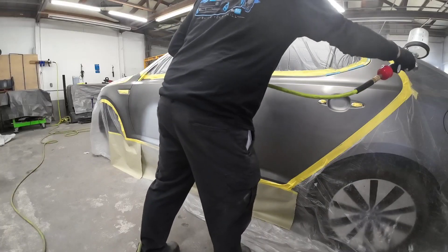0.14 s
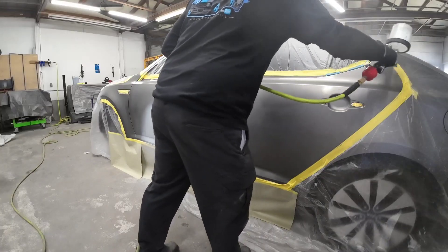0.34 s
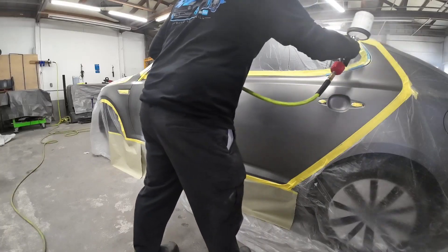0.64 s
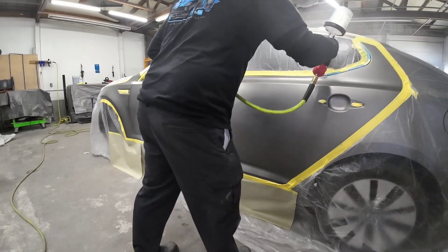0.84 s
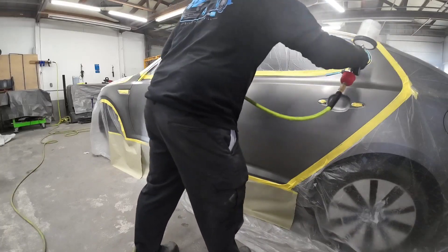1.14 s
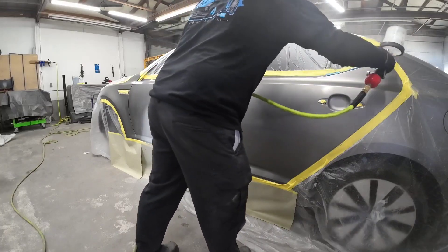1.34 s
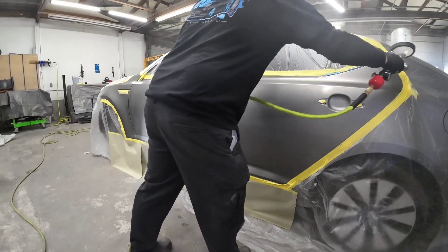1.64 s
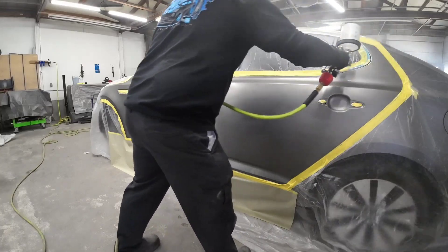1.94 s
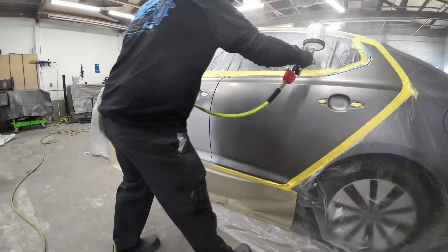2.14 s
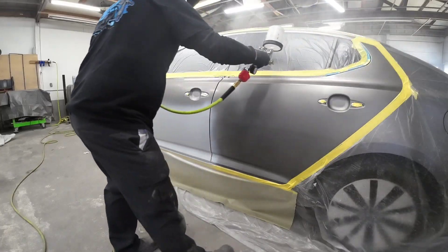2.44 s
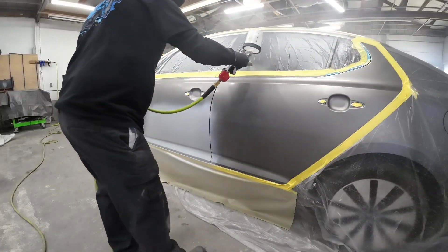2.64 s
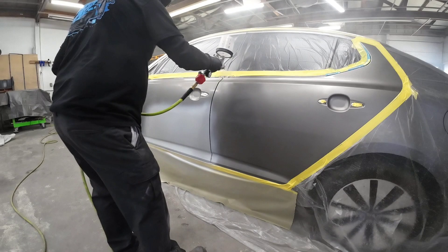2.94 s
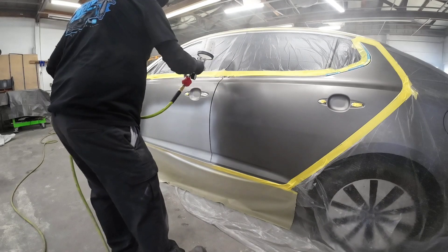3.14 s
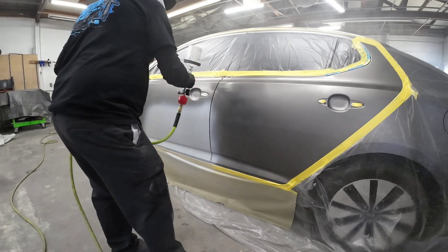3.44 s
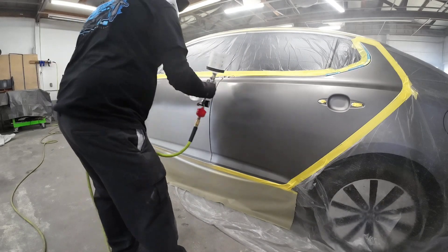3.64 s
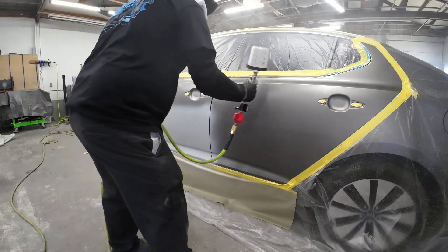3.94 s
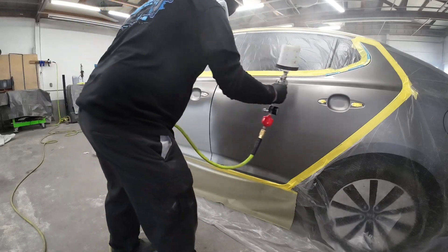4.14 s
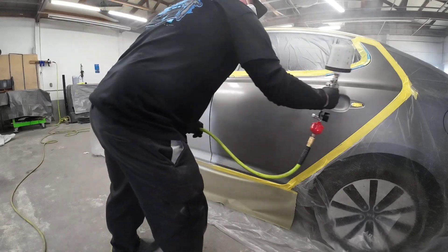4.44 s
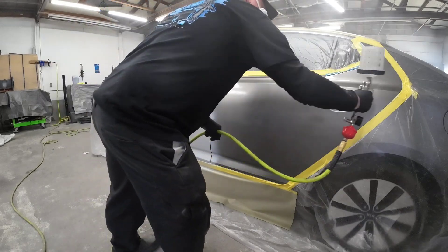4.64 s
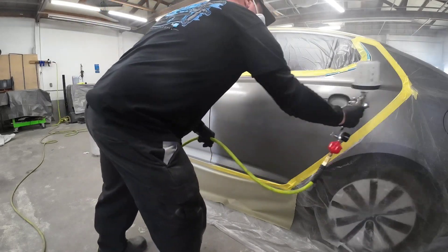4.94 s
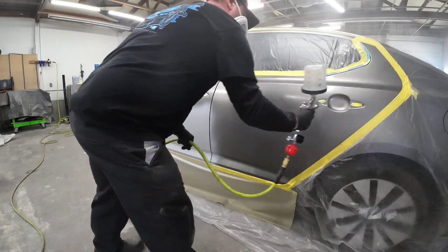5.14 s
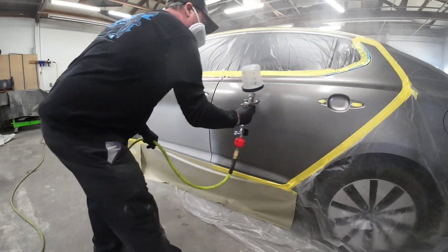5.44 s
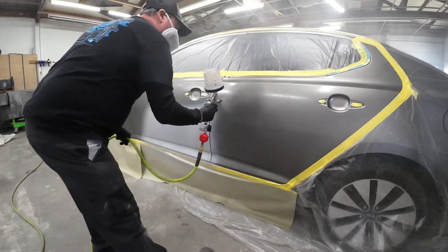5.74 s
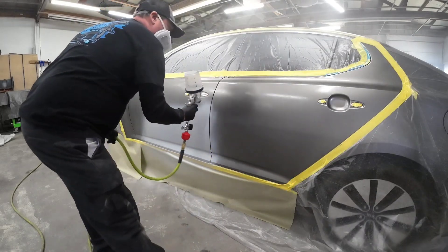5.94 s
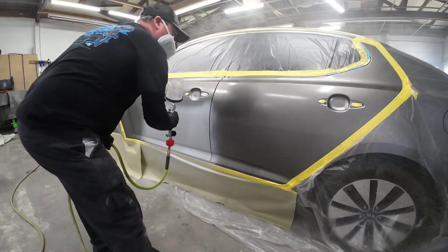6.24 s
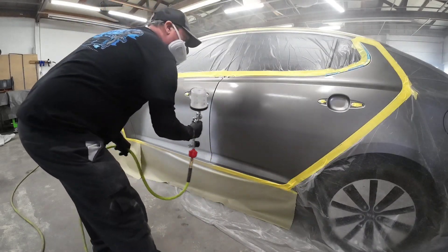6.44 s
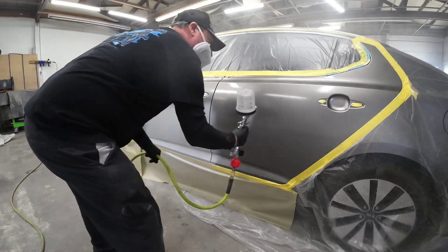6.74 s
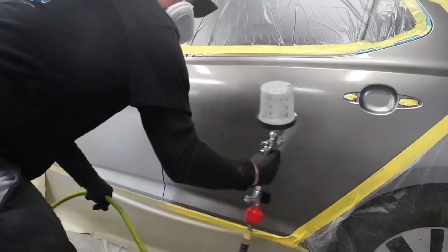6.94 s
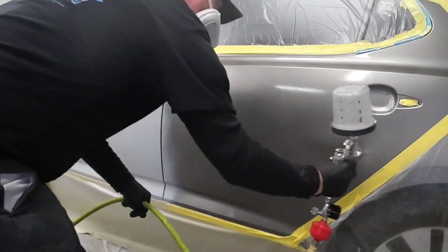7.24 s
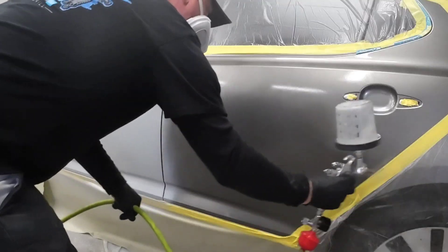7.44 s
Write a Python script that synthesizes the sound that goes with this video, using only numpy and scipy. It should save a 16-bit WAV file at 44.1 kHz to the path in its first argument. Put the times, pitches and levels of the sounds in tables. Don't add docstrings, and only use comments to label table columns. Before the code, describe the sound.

A paint spray gun hisses without a break along a car door in a workshop. The airy jet swells, dulls and brightens with every pass, its softer roar on the metal dropping briefly at the turns. Loose masking film rumbles faintly in the draught. In the second half a low motor hum fades in and slowly sinks. One close microphone, centred, fairly dry.

```python
import sys
import numpy as np
from scipy import signal
from scipy.fft import rfft, irfft
from scipy.io import wavfile

SR = 44100
rng = np.random.default_rng(int(sys.argv[2]) if len(sys.argv) > 2 else 0)


def invert_db(level):
    return 10 ** (np.asarray(level, dtype=float) / 20)


def digitize_waveform(pressure):
    field = np.atleast_2d(pressure).T
    bounded = np.clip(field, -1, 1)
    quanta = np.round(bounded * 32767).astype(np.int16)
    wavfile.write(sys.argv[1], SR, quanta)


N = 334719
STEP = 64


def rms_one(x):
    return x / np.sqrt(np.mean(x ** 2) + 1e-20)


def in_time(rows, step=1):
    time_s, *columns = np.transpose(rows)
    now_s = np.arange(0, N, step) / SR
    return [np.interp(now_s, time_s, column) for column in columns]


def drift(rate_hz):
    r = np.exp(-2 * np.pi * rate_hz * STEP / SR)
    count = len(range(0, N, STEP))
    white = rng.standard_normal(N // STEP + 1001)
    return rms_one(signal.lfilter([1], [1, -2 * r, r * r], white)[-count:])


def swells(rows, rise_s, fall_s, centred=True):
    now_s, rows = np.arange(0, N, STEP) / SR, np.array(rows)
    hold_s = rows[:, 1:2]
    start_s = rows[:, :1] - centred * hold_s / 2
    rise = 1 + (now_s - start_s) / rise_s
    fall = 1 + (start_s + hold_s - now_s) / fall_s
    shape = np.clip(np.minimum(rise, fall), 0, 1)
    return rows[:, 2:].T @ np.sin(shape * np.pi / 2) ** 2


def hump(hz, centre_hz, below, above, db):
    octaves = np.log2(hz / centre_hz)
    power = invert_db(-np.where(octaves < 0, below, above) * octaves ** 2) ** 2
    return power / power.sum(axis=0) * invert_db(db) ** 2


# time_s, loudness_db, strike_db (how squarely it hits the panel), view_db (air cap in view)
JET = [(0, -26.5, -1.5, -12), (.5, -27.5, -2.5, -1), (.72, -27, 2.5, 10), (.86, -22, 2.5, -6),
       (1.3, -24, 1.5, 7), (1.8, -25, -8.5, 7.5), (1.9, -26.5, -1, 5.5), (2.35, -29.5, 0.5, -1.5),
       (2.85, -28, 0, 2), (3.3, -25, 1.5, -2), (3.8, -21.5, 1.5, -6), (4.35, -22, -0.5, -1),
       (4.82, -29.5, -1.5, 6), (5.2, -25.5, -1, 0), (5.92, -22, 1.5, -5), (6.1, -25, 4, -12),
       (6.8, -20.5, 2.5, -6), (7.59, -26.5, -3.5, -4)]
# middle_s, hold_s, splash_change_db
SWEEP_TURNS = [
    (.25, 0.22, -7),
    (.98, 0.11, -2.5),
    (1.73, 0.071, -4),
    (3.46, 0.21, -6),
    (4.92, 0.15, -3.5),
    (6.28, 0.065, -2),
    (7.52, 0.16, -2),
]
# start_s, hold_s, hiss_gain_db, extra_sizzle_db
NOZZLE_FACING = [
    (.2, 0.15, 4.5, 8),
    (.9, 0.11, 8, 8),
    (1.09, 0.073, 7.5, -8),
    (2.93, 0.16, 3.5, 1),
    (3.37, .18, 5.5, 8),
    (6.25, 0.063, 2.5, 2),
    (6.41, .02, -1.5, 2),
]
# middle_s, hold_s, sizzle_change_db
NOZZLE_SHADOWS = [(.14, .02, -25), (.48, .03, -35), (.67, .09, -13), (1.56, .02, -7), (2.1, .02, 3),
                  (2.42, .2, 1), (3.23, .09, -8), (3.65, .02, 8), (4.94, 0.19, -8), (5.98, 0.12, -3),
                  (6.42, .03, 12), (6.59, .03, 0), (7.5, 0.24, -44)]


def jet_levels():
    loud_db, strike_db, view_db = in_time(JET, step=STEP)
    turn_db, = swells(SWEEP_TURNS, rise_s=.047, fall_s=.047)
    face_db, bright_db = swells(NOZZLE_FACING, rise_s=.057, fall_s=.092, centred=False)
    shadow_db, = swells(NOZZLE_SHADOWS, rise_s=.06, fall_s=.06)
    swing_db = loud_db + face_db - loud_db.mean()
    hiss_db = loud_db + face_db
    splash_db = -37 + strike_db + turn_db
    lower_db = -31 + .36 * strike_db + .51 * turn_db + .35 * swing_db
    waver_db = .4 * drift(14)
    sizzle_db = -33.5 + .79 * swing_db + view_db + bright_db + shadow_db + waver_db
    return hiss_db, splash_db, lower_db, sizzle_db, face_db


# time_s, lag_ms
PANEL_LAG = [(0.0, 0.31), (0.42, 0.37), (0.78, 0.48), (1.0, 0.7), (1.41, 0.32), (1.97, 0.35), (2.61, 0.53),
             (3.02, 0.52), (3.5, 0.94), (3.69, 0.69), (4.74, 0.34), (5.13, 0.4), (5.64, 0.65), (6.14, 0.73),
             (6.44, 0.87), (6.65, 0.62), (7.26, 0.38), (7.59, 0.46)]
HISS_SINKS_OCT_PER_MS = .05


def jet_power(hz):
    hiss_db, splash_db, lower_db, sizzle_db, face_db = jet_levels()
    lag_ms, = in_time(PANEL_LAG, step=STEP)
    sink = 2 ** (-HISS_SINKS_OCT_PER_MS * (lag_ms - .5))
    power = hump(hz / sink, 9230, 7.2 + face_db, 26 + face_db, hiss_db)
    power = power + hump(hz, 1470, 8.7, 9, splash_db)
    power = power + hump(hz, 3590, 10.4, 8.6, lower_db)
    power = power + hump(hz, 13900, 18, 60, sizzle_db)
    return power + hump(hz, 437, 56, 5.8, -54 + .23 * (splash_db + 40.5))


# middle_s, hold_s, rise_over_calm_db
PUFFS = [(0, .05, 14), (.95, 1, 15), (2.05, .2, 15.5), (2.5, .2, 9), (3.17, 0.2, 20.5), (3.75, 0.088, 20),
         (4.3, 0.25, 11), (4.65, 0.19, 17), (5.4, 1, 4), (6.03, .05, 18), (6.6, .03, 17.5), (7.1, .2, 5),
         (7.45, 0.11, 21)]


def masking_film_power(hz):
    puff_db, = swells(PUFFS, rise_s=.17, fall_s=.17)
    return hump(hz, 300, 3.6, 1.8, -71 + puff_db)


# pitch_hz, band_level_db
SHOP_FLOOR = [(30, -85), (60, -77), (110, -74), (600, -65.5)]


def shop_floor_power(hz):
    pitch_hz, level_db = np.transpose(SHOP_FLOOR)
    return invert_db(np.interp(np.log(hz), np.log(pitch_hz), level_db)) ** 2


def turbulence(shared_db, local_db, own_db):
    edges_hz = 28 * 2 ** np.arange(0, 9.3, .25)
    hz = np.sqrt(edges_hz[1:] * edges_hz[:-1])[:, None]
    power = jet_power(hz) + masking_film_power(hz) + shop_floor_power(hz)
    white, out = rng.standard_normal((2, N)), np.zeros(N)
    gust = drift(21)
    eddies = [drift(1.4) for _ in range(len(hz) // 3 + 1)]
    for k, band_hz in enumerate(zip(edges_hz, edges_hz[1:])):
        bright = np.clip(np.log2(hz[k, 0] / 2000) / 2, 0, 1)
        flicker_db = bright * (shared_db * gust + local_db * eddies[k // 3] + own_db * drift(12.6))
        level = np.sqrt(power[k]) * invert_db(flicker_db)
        gain = np.interp(np.arange(N) / STEP, np.arange(power.shape[1]), level)
        sos = signal.butter(2, band_hz, "band", fs=SR, output="sos")
        out += gain * rms_one(signal.sosfilt(sos, white[k % 2]))
    return out


# time_s, lag_ms, share (negative = inverted)
WRIST_ECHO = [(0, 0.04, 0.042), (.7, 0.058, 0.025), (1.0, 0.12, 0.13), (1.5, 0.043, 0.072),
              (2.5, .12, 0.021), (3.03, 0.097, 0.31), (3.45, 0.14, 0.23), (3.95, 0.11, 0.31),
              (4.5, 0.093, 0.12), (4.9, 0.1, .01), (5.6, 0.085, 0.28), (5.92, 0.12, 0.21),
              (6.08, 0.12, 0.22), (6.22, 0.21, 0.39), (6.47, 0.18, 0.28), (6.7, .14, 0.45),
              (7.0, .12, 0.37), (7.59, 0.15, 0.17)]
FINE = 4


def bodywork(x, boost=1.15):
    hiss_sos = signal.butter(1, [2500, 14000], "band", fs=SR, output="sos")
    gun_sos = signal.butter(2, 9200, fs=SR, output="sos")
    bands = [signal.sosfiltfilt(hiss_sos, x), signal.sosfiltfilt(gun_sos, x)]
    narrow, dull = signal.resample_poly(bands, FINE, 1, axis=1)
    panel_ms, = in_time(PANEL_LAG)
    uneven = 1 + .35 * np.repeat(drift(3), STEP)[:N]
    near = (.45 / panel_ms) ** .5 * uneven
    gun_ms, gun_share = in_time(WRIST_ECHO)
    paths = [(panel_ms, near * .11, narrow),
             (panel_ms + .062, near * -.085, narrow),
             (panel_ms - .056, near * -.035, narrow),
             (gun_ms, gun_share, dull)]
    out = x.copy()
    for lag_ms, share, source in paths:
        position = FINE * (np.arange(N) - lag_ms * SR / 1000)
        out += boost * share * np.interp(position, np.arange(FINE * N), source)
    return out


SPLIT_PER_S, SPLIT_LOW_HZ, SPLIT_HIGH_HZ = 7.3, 4200, 13800
SPLIT_MIN_WIDTH_HZ, SPLIT_MAX_WIDTH_HZ = 1000, 2300


def split_bands(mid, size=2048):
    side, hz = np.zeros(N), np.arange(size // 2 + 1) * SR / size
    window = signal.windows.kaiser_bessel_derived(size, 4 * np.pi)
    for when, where, wide in rng.random((int(SPLIT_PER_S * N / SR), 3)):
        start = 711 + size // 2 * int(when * (2 * N // size - 3))
        low_hz = SPLIT_LOW_HZ + (SPLIT_HIGH_HZ - SPLIT_LOW_HZ) * where ** 1.2
        width_hz = SPLIT_MIN_WIDTH_HZ + wide ** 2 * (SPLIT_MAX_WIDTH_HZ - SPLIT_MIN_WIDTH_HZ)
        frame = slice(start, start + size)
        band = (hz > low_hz) * (hz < low_hz + width_hz)
        level = np.std(irfft(rfft(mid[frame] * window) * band)) * invert_db(.2)
        noise = rms_one(irfft(rfft(rng.standard_normal(size)) * band))
        side[frame] += level * window * noise
    return side


# time_s, level_db
MOTOR_HUM = [
    (4.4, -101),
    (4.65, -66),
    (5.31, -56),
    (5.95, -52),
    (6.3, -65),
    (7.05, -50),
    (7.36, -52),
    (7.41, -62),
    (7.54, -52),
]
HUM_START_HZ, HUM_SAG_HZ_PER_S = 89.5, 3.4


def motor():
    level_db, = in_time(MOTOR_HUM)
    since_s = np.arange(N) / SR - MOTOR_HUM[0][0]
    hz = HUM_START_HZ - HUM_SAG_HZ_PER_S * np.maximum(since_s, 0)
    fade_in = np.clip(since_s / .15, 0, 1)
    return np.sqrt(2) * fade_in * invert_db(level_db) * np.sin(2 * np.pi * np.cumsum(hz) / SR)


def scene():
    mono = bodywork(turbulence(shared_db=.34, local_db=.15, own_db=1.0)) + motor()
    return np.array([mono, mono])


def band_limit(x):
    return signal.sosfilt(signal.butter(12, 16790, fs=SR, output="sos"), x)


CUTOFF_HZ, CEILING = 15520, .8


def record(dry):
    rounded = CEILING * np.tanh(dry / CEILING)
    top_sos = signal.ellip(18, .2, 90, CUTOFF_HZ, fs=SR, output="sos")
    cut = signal.sosfilt(top_sos, rounded)
    mix = cut + split_bands(cut[0]) * [[1], [-1]]
    return band_limit(mix)


dry = scene()
out = record(dry)
digitize_waveform(out)
```